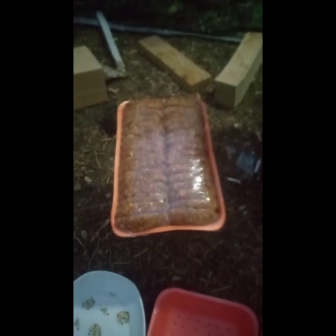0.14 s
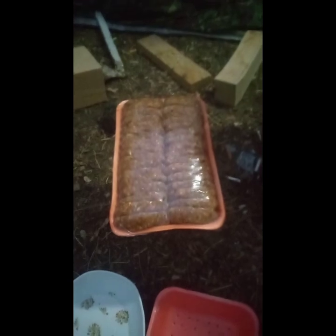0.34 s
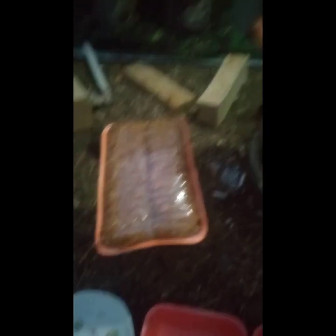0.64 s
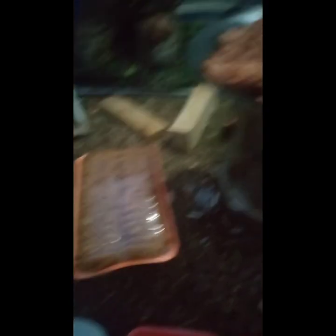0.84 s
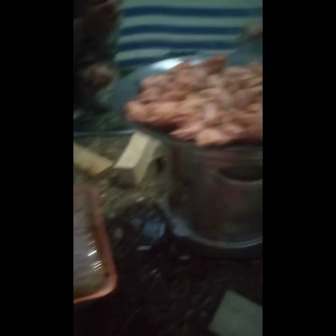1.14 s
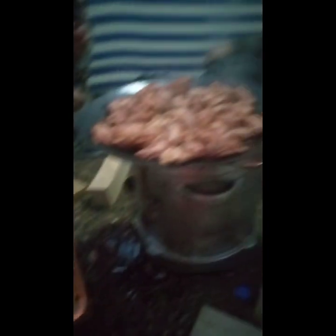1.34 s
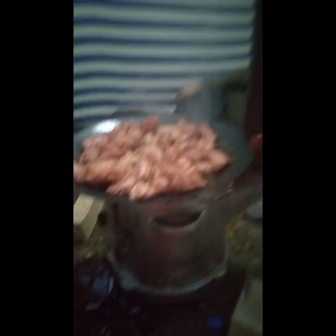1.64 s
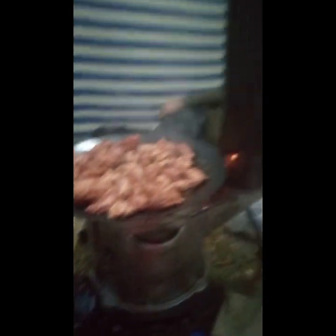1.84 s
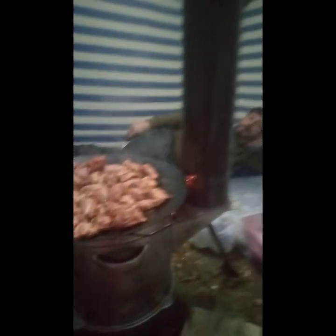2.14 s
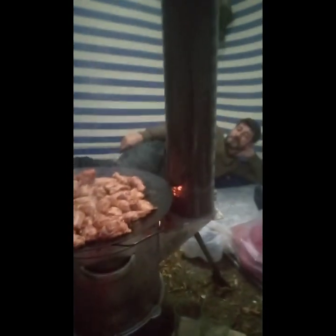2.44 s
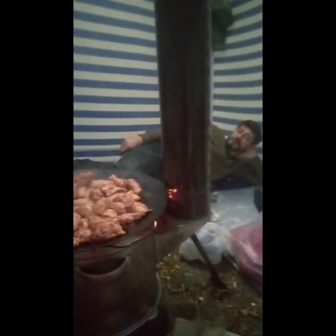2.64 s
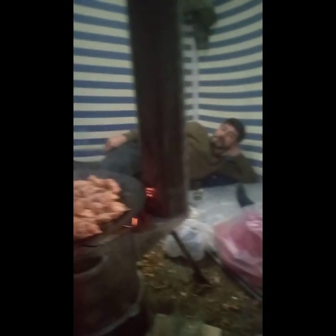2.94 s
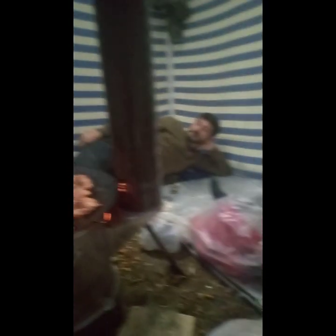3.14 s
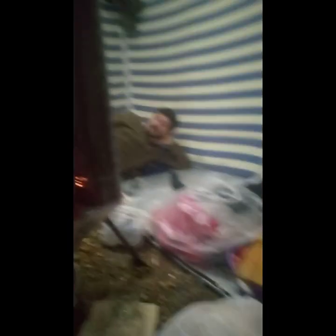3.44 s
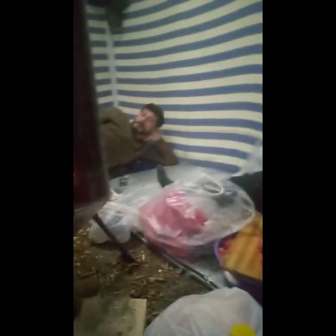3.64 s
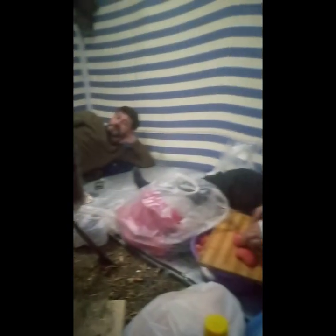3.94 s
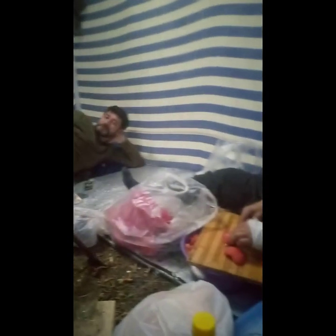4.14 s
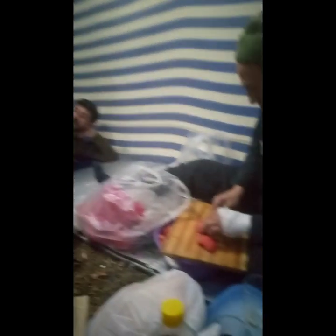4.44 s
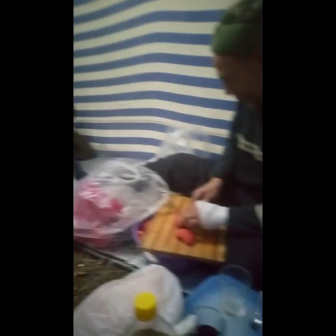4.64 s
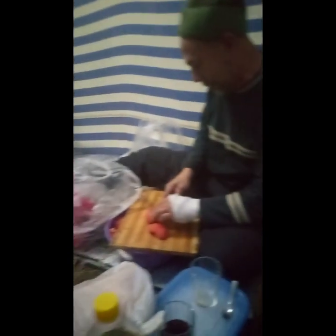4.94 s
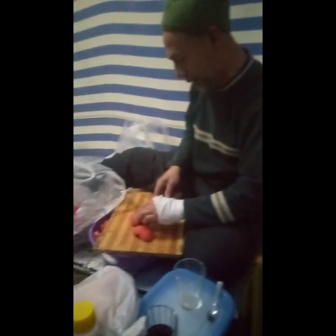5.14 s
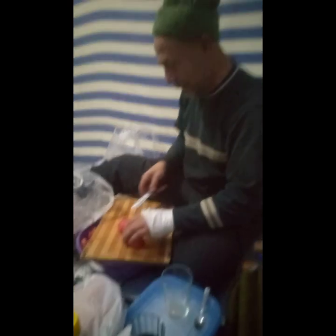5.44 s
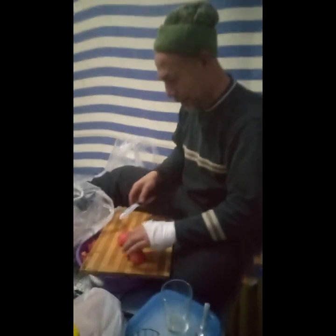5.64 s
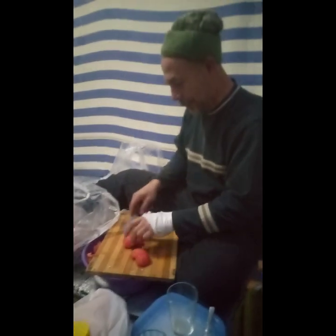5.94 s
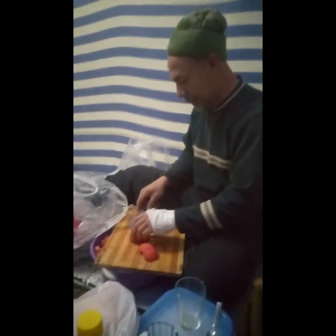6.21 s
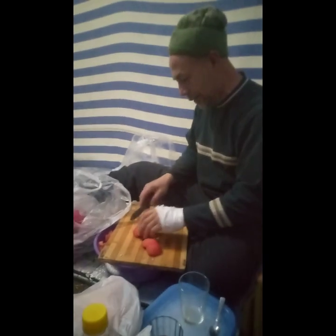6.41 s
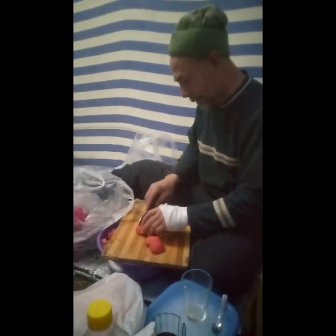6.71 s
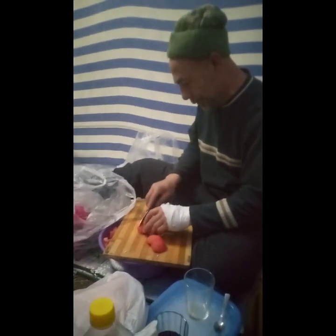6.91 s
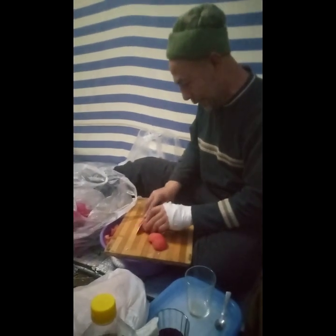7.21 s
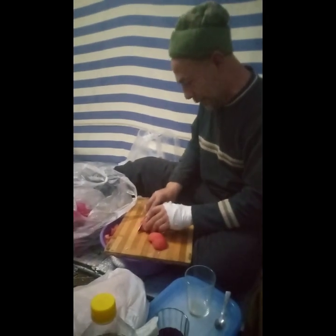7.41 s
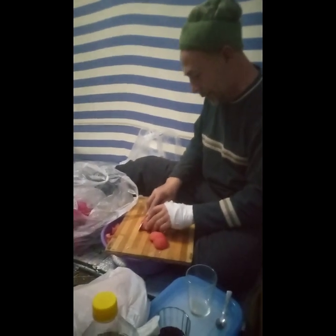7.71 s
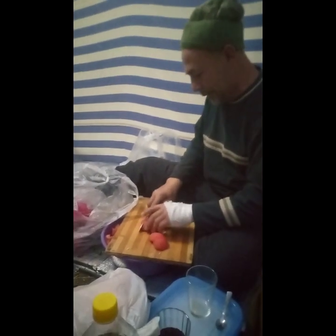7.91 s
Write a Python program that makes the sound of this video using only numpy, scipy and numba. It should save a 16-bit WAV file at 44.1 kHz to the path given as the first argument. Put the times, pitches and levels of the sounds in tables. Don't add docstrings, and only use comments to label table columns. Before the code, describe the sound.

Close microphone inside a tent at night: steady hissing rain made of thousands of tiny ringing droplets all around, with a short soft wash from the cloth. Single bright ticks and louder crisp drops burst at uneven moments, strongest just after two seconds, followed by small spitting bubbles. Soft cloth thuds come between them, the last strong one near the end. A quiet low stove draught wavers underneath throughout.

```python
import sys
import numpy as np
from scipy import signal
from scipy.fft import rfft, irfft, next_fast_len
from scipy.io import wavfile
from scipy.ndimage import uniform_filter1d
from numba import njit

SR = 44100
rng = np.random.default_rng(int(sys.argv[2]) if len(sys.argv) > 2 else 0)


def generate_wav(sig):
    pcm = np.round(np.clip(np.atleast_2d(sig).T, -1, 1) * 32767).astype(np.int16)
    wavfile.write(sys.argv[1], SR, pcm)


def undo_db(level):
    steps = np.asarray(level, float) / 20
    return 10 ** steps


N = 355887

NEAR_DB = -2.5


def curve(table):
    s, *columns = np.transpose(table)
    return [np.interp(np.arange(N) / SR, s, c) for c in columns]


def unit(x):
    return x / np.sqrt(np.mean(x ** 2))


def walk(rate):
    hold = int(SR / rate)
    steps = np.repeat(rng.standard_normal(N // hold + 1), hold)
    return 3.4 * uniform_filter1d(uniform_filter1d(steps, hold), hold)[:N]


def band(x, hz, width):
    return signal.lfilter(*signal.iirpeak(hz, hz / width, SR), x)


def colour_db(hz):
    # f/Hz, level/dB (per Hz)
    response = [(410, -35), (800, -17.5), (1700, -7), (2600, -1.5), (3460, -0.5), (5590, 0.5), (6550, 4),
                (7250, 0.5), (8260, -12.5), (9770, -20.5), (13700, -26), (14700, -9.5), (15400, -13),
                (17000, -25)]
    knot_hz, knot_db = np.transpose(response)
    return np.interp(np.log(np.maximum(hz, 1)), np.log(knot_hz), knot_db)


def coloured(x):
    cepstrum = irfft(np.log(undo_db(colour_db(np.fft.rfftfreq(2048, 1 / SR)))))
    cepstrum[1:1024] *= 2
    cepstrum[1025:] = 0
    return signal.fftconvolve(x, irfft(np.exp(rfft(cepstrum))))[:N]


@njit
def grains(start, hz, t60, octaves, size):
    out = np.zeros(N)
    for g in range(len(start)):
        length, phase = max(int(t60[g] * SR), 2), 0.
        step, a = 2 * np.pi * hz[g] / SR, size[g]
        rise, fade = 2 ** (octaves[g] / length), 1e-3 ** (1 / length)
        for i in range(max(start[g], 0), min(start[g] + length, N)):
            phase, step, a = phase + step, min(step * rise, 3.), a * fade
            out[i] += a * np.sin(phase)
    return out


def ring(s, hz, t60, octaves, size):
    return grains((s * SR).astype(np.int64), 1. * hz, t60 + 0 * s, octaves + 0 * s, 1. * size)


def tent(x, near_db=0):
    t60_s, rise_s, wash_db = 0.17, 0.0029, 1
    t = np.arange(8192) / SR
    tail = rng.standard_normal(len(t)) * undo_db(-60 * t / t60_s) * np.minimum(t / rise_s, 1)
    return x + undo_db(wash_db + near_db) * signal.fftconvolve(x, tail / np.linalg.norm(tail))[:N]


def stove():
    # t/s, level/dB
    draught = [(0.0, -49.5), (0.29, -48.5), (0.43, -53), (0.94, -47.5), (2.36, -49.5), (2.43, -56),
               (2.74, -47), (3.14, -52), (3.26, -47.5), (3.57, -54), (3.64, -48.5), (4.79, -47.5),
               (5.55, -57.5), (6.09, -50.5), (6.18, -45), (6.43, -48.5), (7.93, -46.5), (8.07, -48)]
    # f/Hz, width/Hz, level/dB
    flue_modes = [(72.4, 47, -7.5), (158.1, 30, -1.5), (228.9, 31.8, 0), (303.5, 26, -9), (103, 66, -6.5)]
    # t/s, level/dB
    air = [
        (0.0, -53.5),
        (3.06, -56.5),
        (3.42, -59.5),
        (4.85, -58.5),
        (5.06, -61.5),
        (7.24, -59),
        (8.07, -62.5),
    ]
    flue = 0
    for hz, width, db in flue_modes:
        mode = band(band(rng.standard_normal(N), hz, 1.4 * width), hz, 1.4 * width)
        flue = flue + undo_db(db + 0.59 * walk(6)) * unit(mode)
    murmur = band(rng.standard_normal(N), 657, 750) * undo_db(0.59 * walk(12))
    return unit(flue) * undo_db(curve(draught)[0]) + unit(murmur) * undo_db(curve(air)[0] + 1.0)


def squeak():
    # start t/s, end t/s, f/Hz, level/dB, octave level/dB
    whistle = (1.7, 1.82, 1405, -52, -56)
    start, end, hz, db, octave_db = whistle
    t = np.arange(N) / SR
    gate = np.clip(np.minimum(t - start, end - t) / 0.0081, 0, 1)
    return gate * (undo_db(db) * np.sin(2 * np.pi * hz * t) + undo_db(octave_db) * np.sin(4 * np.pi * hz * t))


def patch():
    when, pitch, size = rng.random((5000, 3)).T
    hz = 800 * undo_db(26 * pitch)
    single = ring(when * N / SR, hz, 2.8 / hz, 0.22, hz * undo_db(-3.5 * np.log(size + 0.057)))
    when, pitch, size = np.repeat(rng.random((140, 3)), 12, axis=0).T
    late, detune, loud = rng.standard_normal((len(when), 3)).T
    hz = 1900 * undo_db(18.5 * pitch) * undo_db(1.22 * detune)
    strength = hz * undo_db(3.5 * loud - 1.4 * np.log(size + 0.15))
    swarm = ring(when * N / SR + .009 * np.abs(late), hz, 12 / hz, 0.54, strength)
    return tent(unit(single) * undo_db(-5.5) + unit(swarm) * undo_db(-9.5))


def mist_db():
    # start t/s, length/s, level/dB
    puffs = [(0.397, 0.124, -47.5), (0.55, 0.03, -44), (0.74, 0.046, -46), (0.821, 0.13, -48.5),
             (0.9, 0.056, -47), (1.61, 0.076, -48), (1.994, 0.053, -45), (2.1, 0.19, -45),
             (2.505, 0.029, -49.5), (2.714, 0.035, -51), (3.622, 0.097, -49), (3.994, 0.11, -45.5),
             (4.51, 0.061, -49), (4.62, 0.046, -43.5), (4.776, 0.081, -50), (5.285, 0.38, -51.5),
             (5.862, 0.031, -47), (5.944, 0.08, -50.5), (6.176, 0.34, -48), (6.425, 0.068, -51.5),
             (6.518, 0.064, -45), (6.888, 0.062, -46), (6.978, 0.052, -52), (7.074, 0.067, -46.5),
             (7.186, 0.12, -50), (7.771, 0.038, -46)]
    quiet_db, rise_s = -52, .012
    start, length, db = np.transpose(puffs)[:, :, None]
    since = np.arange(0, N, 64) / SR - start
    shape = np.clip(np.minimum(since / rise_s, 1.6 - 1.2 * since / length), 0, 1)
    return np.repeat(np.max((db - quiet_db) * shape, axis=0), 64)[:N]


def patter():
    # t/s, level/dB, fineness/dB (finer droplets tilt the sound upward)
    rain = [(0.0, -42.5, 0), (0.4, -42.5, -3.5), (0.97, -43.5, 2.5), (1.32, -43, 5.5), (2.0, -43, -1),
            (2.22, -43, 0.5), (2.72, -43, 1.5), (4.54, -43.5, 3), (4.63, -43, 4.5), (5.1, -43, 2),
            (5.55, -40, 2.5), (5.73, -43, 2), (6.16, -40.5, 0.5), (6.29, -43, 2), (6.83, -43.5, 2.5),
            (7.26, -41.5, 0.5), (7.64, -44.5, 4), (8.07, -44, 4)]
    splits_hz, gust_hz, gusts_db = (4500, 8000), 14, (.4, .5, .7)
    flat = unit(sum(patch() for _ in range(5))) + undo_db(-3) * rng.standard_normal(N)
    size = next_fast_len(N)
    spectrum, f = rfft(coloured(flat), size), np.fft.rfftfreq(size, 1 / SR)
    below = [1 / (1 + (f / edge) ** 8) for edge in splits_hz]
    parts = below[0], below[1] - below[0], 1 - below[1]
    level_db, fine_db = curve(rain)
    level_db = level_db + 0.6 * walk(150)
    mist = mist_db()
    tilts = 0.5, -2.73 + fine_db + 0.68 * mist, -12 + 0.16 * fine_db + mist
    out = 0
    for part, tilt, gust_db in zip(parts, tilts, gusts_db):
        db = level_db + tilt + gust_db * walk(gust_hz)
        out = out + unit(irfft(spectrum * part)[:N]) * undo_db(db)
    return out


def thuds():
    # t/s, peak level/dB, f/Hz
    thumps = [(0.835, -41, 538), (1.394, -41, 930), (2.138, -40, 647), (2.449, -41, 654), (3.109, -41, 670),
              (3.276, -46, 770), (4.342, -53, 845), (4.847, -48, 767), (5.137, -50, 940), (6.244, -45, 875),
              (6.52, -56, 865), (7.123, -48, 890), (7.22, -36, 600), (4.812, -47, 625), (6.161, -55, 686),
              (6.18, -47, 920), (6.296, -43, 426), (7.164, -41, 430), (7.523, -33.5, 475)]
    s, peak_db, hz = np.repeat(np.transpose(thumps), 4, axis=1)
    late, detune = rng.random((len(s), 2)).T
    thump = ring(s + 0.00617 * late, hz * undo_db(13.0 * (detune - 1.11)), 0.014, 0.15, undo_db(peak_db + 2.5))
    return tent(signal.sosfilt(signal.butter(2, 220, "high", fs=SR, output="sos"), thump), NEAR_DB)


def specks():
    # t/s, peak level/dB
    spray_specks = [(0.447, -34), (0.4938, -31), (2.088, -27), (2.1385, -28), (3.6217, -38), (4.006, -29),
                    (4.7875, -35), (5.3896, -41), (5.425, -36), (5.973, -37), (6.002, -31.5), (6.2851, -33),
                    (6.779, -41), (6.9735, -44)]
    s, peak_db = np.repeat(np.transpose(spray_specks), 5, axis=1)
    late, pitch, loud = rng.random((len(s), 3)).T
    hz = 11500 * undo_db(2.7 * pitch)
    rings = ring(s + 0.0083 * late ** 6.0, hz, 6 / hz, .05, undo_db(peak_db + 17.5 + 6 * loud))
    return tent(coloured(rings), NEAR_DB)


def ticks():
    # t/s, peak level/dB, f/Hz
    early = [(0.0308, -25.0, 2780), (0.2598, -26.0, 3530.0), (0.3999, -26, 3140.0), (0.4748, -19.0, 6720.0),
             (0.4873, -23.0, 6500.0), (0.4924, -17, 6460.0), (0.5123, -19, 2640), (0.5559, -29, 5250.0),
             (0.7493, -30, 2370.0), (0.8438, -24.0, 3500), (1.1837, -27, 3570.0), (1.2115, -20, 3920.0),
             (1.2292, -23.0, 6850.0), (1.2345, -20, 6590.0), (1.3955, -20, 3570.0), (1.4095, -25, 3100.0),
             (1.4112, -25, 2670.0), (1.5366, -18, 5860.0), (1.5388, -24.0, 6370.0), (1.5471, -17, 4650.0),
             (1.6378, -23.0, 6720.0), (1.6499, -17, 4870.0), (1.7191, -22.0, 6500.0), (1.9288, -27, 2240.0),
             (2.0993, -18, 4570.0), (2.1422, -15.0, 6980.0), (2.277, -27, 2970.0), (2.2936, -19.0, 5300.0),
             (2.4534, -25.0, 3490.0), (2.6313, -28, 3660.0), (2.6401, -18, 3240), (2.7335, -22, 3450.0),
             (2.7409, -23, 5990.0), (2.9197, -20, 6930.0), (2.949, -18, 3750.0), (2.9535, -24.0, 3060.0),
             (3.0241, -25, 3620.0), (3.0384, -24.0, 3490.0), (3.111, -14, 6160.0), (3.173, -25, 5640.0),
             (3.2361, -23, 3190.0), (3.2779, -25.0, 3920.0), (3.2924, -21, 3700.0), (3.3076, -22, 6370.0),
             (3.3492, -20, 6290.0), (3.3686, -17, 5860.0), (3.4148, -27, 6680.0), (3.429, -12, 6760.0),
             (3.4304, -29, 6200.0), (3.4916, -18, 3500), (3.8642, -27.0, 3140.0), (3.9478, -14, 4780.0),
             (4.0152, -16.0, 6760.0), (4.0434, -20.0, 6500.0), (4.0457, -19.0, 6330.0),
             (4.1218, -21.0, 2890.0), (4.1436, -19, 4480.0), (4.3486, -16, 6590.0), (4.3504, -29, 3700.0),
             (4.5111, -23, 4130.0)]
    # t/s, peak level/dB, f/Hz
    later = [(4.5145, -20.0, 4310.0), (4.5737, -24, 6330.0), (4.6455, -18, 4910.0), (4.6476, -21, 4390.0),
             (4.7232, -15, 4630), (4.7606, -22.0, 5120.0), (4.8255, -22.0, 3320.0), (4.8286, -21.0, 2230),
             (5.1929, -25, 2450.0), (5.2624, -20, 5120.0), (5.5387, -23, 4390.0), (5.5423, -25, 2760.0),
             (5.5551, -25, 3700.0), (5.6541, -25, 5680.0), (5.7103, -15, 6500.0), (5.7762, -15, 5560.0),
             (5.8747, -19, 4950.0), (5.8796, -24, 5600.0), (6.056, -22, 4740.0), (6.1743, -19, 5900.0),
             (6.2971, -21.0, 4220.0), (6.3, -17, 4050.0), (6.3351, -20, 6630.0), (6.3398, -22, 2670.0),
             (6.4097, -25.0, 6420.0), (6.446, -26, 4520.0), (6.471, -22, 6760.0), (6.475, -19, 6120.0),
             (6.5319, -22.0, 4260.0), (6.5355, -12, 4130.0), (6.7607, -30, 3880.0), (6.8377, -28, 6630.0),
             (6.906, -20, 6420.0), (6.9082, -23.0, 7020.0), (6.9333, -22.0, 5510.0),
             (6.9379, -21.0, 4050.0), (6.9451, -25, 4010.0), (6.9785, -23.0, 4740.0),
             (7.0121, -21.0, 5900.0), (7.079, -26, 2890.0), (7.1944, -23, 4520.0), (7.2037, -22, 4650.0),
             (7.2085, -28, 2630.0), (7.2539, -16, 5640.0), (7.2554, -21, 3620.0), (7.3229, -20, 2710.0),
             (7.3967, -24.0, 2800.0), (7.4917, -23.0, 5430.0), (7.5966, -27, 5860.0), (7.5992, -25, 4740.0),
             (7.6249, -19.0, 4740.0), (7.6513, -28, 3790.0), (7.721, -28, 4480.0), (7.7851, -27, 5900.0),
             (7.8106, -29, 5940.0), (7.8152, -21.0, 5680.0), (7.9678, -31, 3360.0), (7.9835, -29, 6680.0),
             (7.9861, -23, 5730.0), (8.0284, -22, 4870.0)]
    s, peak_db, hz = np.transpose(list(early) + list(later))
    rings = ring(s, hz, 8 / hz, 0.083, undo_db(peak_db + 1.5 - colour_db(hz)))
    return tent(coloured(rings), -8)


def all_drops():
    # t/s, ring peak level/dB, f/Hz, splash level/dB (re ring)
    heavy = [(0.473, -14, 6980, -23), (1.195, -17, 6650, -23), (1.396, -23, 3300, -20),
             (1.637, -18, 6900, -20), (1.998, -19, 6900, -24), (2.0888, -14, 3360, -31),
             (2.1401, -5.5, 7160, -32), (2.15, -8.5, 5760, -23.5), (2.2807, -15, 6610, -28),
             (3.023, -21, 3660, -42), (3.315, -11, 6130, -28), (3.4155, -15, 6300, -23),
             (3.691, -13.5, 5800, -27), (4.0055, -14, 6510, -29), (4.02, -16, 7700, -16),
             (4.5098, -9.5, 5050, -33), (4.6433, -20, 4030, -21), (4.7578, -15.5, 5070, -26),
             (4.817, -13, 3800, -31), (5.4685, -18.5, 5500, -23), (5.5363, -25, 6300, -29),
             (5.875, -16.5, 4600, -21), (6.168, -15.5, 5890, -27), (6.217, -19, 3560, -25),
             (6.257, -13.5, 3930, -24), (6.295, -14, 4070, -21.5), (6.534, -9, 4900, -24),
             (7.1222, -22, 5330, -24), (7.206, -17, 4800, -19), (7.5944, -19, 4650, -21)]
    # t/s, ring peak level/dB, f/Hz
    light = [(1.22, -8, 6840), (1.537, -16, 5940), (1.5454, -20, 5500), (1.6253, -14, 6790),
             (1.718, -9, 6610), (2.379, -21, 3400), (3.3477, -14, 6000), (3.425, -13.5, 5140),
             (3.541, -18, 3440), (3.957, -17, 4700), (3.9615, -14.5, 4900), (3.073, -24, 6500),
             (3.084, -14, 5500), (6.474, -17, 6500), (4.0152, -19, 6500), (4.492, -16, 6190),
             (4.8556, -11.5, 4330), (4.984, -15, 3420), (5.261, -22, 2870), (5.9255, -32, 4210),
             (6.334, -17, 6500), (6.7595, -29, 3860), (6.976, -16, 4790), (7.2529, -19, 3340),
             (7.2832, -21, 3540), (7.4946, -14, 6400), (7.623, -13, 4600), (7.81, -16, 5740),
             (7.9662, -13.5, 3800)]
    light_splash_db = np.full((1, len(light)), -35.)
    return np.hstack([np.transpose(heavy), np.vstack([np.transpose(light), light_splash_db])])


def trains():
    # t/s, level/dB, f/Hz, length/s
    air_pockets = [(0.054, -52, 1620, .028), (0.857, -41.5, 1790, .013), (1.11, -50, 1600, 0.0099),
                   (1.12, -47, 1820, 0.023), (1.135, -48, 2300, .015), (1.22, -46, 2110, .02),
                   (1.406, -41, 2740, .009), (1.878, -50, 1220, .02), (1.92, -44.5, 2300, .03),
                   (2.33, -47, 1990, .035), (2.362, -45, 2300, 0.013), (2.865, -47, 2250, .02),
                   (2.378, -49, 1950, .013), (2.45, -45, 1430, .04), (2.82, -50, 1160, .018),
                   (3.156, -45, 1620, 0.018), (3.365, -46, 1980, .006), (4.048, -45.5, 2150, .035),
                   (7.69, -53, 1410, 0.016), (4.26, -44, 1870, .03), (4.342, -42.5, 1310, 0.021),
                   (4.479, -45, 1970, .016), (4.641, -43, 2240, .005), (4.818, -40, 2240, .02),
                   (4.845, -46, 2040, 0.018), (5.436, -46, 2050, .024), (5.626, -40, 1940, .006),
                   (5.958, -42.5, 1600, .015), (6.1, -47.5, 1840, .035), (6.536, -39.5, 1485, .01),
                   (6.552, -46, 1470, 0.026), (6.686, -43, 2100, .008), (6.929, -46, 2140, .019),
                   (7.065, -49, 2040, .039), (7.539, -51, 1370, .015), (7.777, -46, 2030, .036),
                   (0.568, -42.5, 6860, 0.027), (0.905, -46.5, 2700, 0.033), (1.159, -47, 3830, 0.03),
                 (1.236, -44, 3100, 0.038), (1.303, -46, 2430, 0.023), (3.019, -43, 3600, .018),
                 (2.22, -42, 5350, 0.026), (2.234, -43, 3200, 0.048), (2.537, -44, 2770, 0.0057),
                 (3.293, -42, 4500, 0.017), (3.579, -44, 2680, .009), (3.651, -39, 3200, 0.014),
                 (4.041, -43, 3830, 0.012), (4.119, -42, 2620, 0.04), (4.274, -44, 2560, 0.022),
                 (4.414, -41, 3720, 0.014), (4.866, -43, 3400, 0.011), (5.537, -46, 2380, 0.027),
                 (5.538, -41, 4130, 0.033), (5.644, -47, 2460, 0.021), (5.909, -40, 3800, 0.028),
                 (6.053, -37.5, 4050, .012), (6.331, -36, 4810, 0.0092), (6.595, -42.5, 2260, 0.03),
                 (6.855, -44, 3060, 0.041), (6.912, -40.5, 3070, .019), (7.318, -40, 2600, 0.0073),
                 (7.4, -46, 2720, 0.0088), (7.437, -45, 2500, 0.017), (7.534, -41, 2970, .006)]
    # t/s, level/dB, f/Hz, length/s
    spits = [(0.588, -40, 1260.0, 0.0097), (0.667, -42, 1150.0, 0.0071), (1.257, -39, 2950, 0.01),
             (1.404, -37.5, 1460, 0.011), (1.543, -39, 4770.0, 0.0093), (1.766, -42.0, 1520, 0.011),
             (2.095, -38, 4820.0, 0.01), (2.147, -31.0, 4850, 0.0086), (2.15, -31, 2490, 0.0076),
             (2.175, -30, 4900, 0.01), (2.248, -35.0, 3270.0, 0.0091), (2.288, -36.0, 5280.0, 0.01),
             (2.464, -35, 2630, 0.011), (3.421, -33.0, 4590.0, 0.012), (3.579, -39, 2700.0, 0.01),
             (4.036, -33, 3620.0, 0.01), (4.04, -46, 1960, 0.01), (4.161, -39, 1780.0, 0.011),
             (4.356, -40, 1240, 0.01), (4.506, -38, 3900.0, 0.01), (4.641, -34, 5400.0, 0.0083),
             (4.642, -28.5, 4190.0, 0.01), (4.753, -39, 5230.0, 0.01), (4.81, -34.0, 4310.0, 0.01),
             (5.392, -34.0, 4130.0, 0.01), (5.533, -35.0, 4130.0, 0.0098), (5.593, -38, 3900.0, 0.01),
             (5.614, -38, 4590.0, 0.01), (5.682, -32.5, 3560.0, 0.01), (5.873, -35, 3000, 0.0088),
             (5.895, -32, 3400, 0.012), (5.906, -32, 4130.0, 0.01), (5.928, -32, 5050.0, 0.01),
             (5.95, -28.5, 4000, 0.0092), (5.951, -32, 4740, 0.0088), (6.088, -33, 4930, 0.012),
             (6.335, -36.0, 2660, 0.0092), (6.438, -34.5, 3960.0, 0.01), (6.529, -32, 3520, 0.011),
             (6.98, -40, 2030, 0.011), (7.119, -31, 5000, 0.01), (7.211, -46, 1550.0, 0.012),
             (7.28, -32, 3620.0, 0.01), (7.447, -34.5, 2530.0, 0.0091), (8.065, -37, 1320.0, 0.0081)]
    foam_db, foam_s, lead_s = -3, .008, 0.0022
    s, peak_db, hz, splash_db = all_drops()
    foam = np.transpose([s - lead_s, peak_db + splash_db + foam_db, hz, foam_s + 0 * s])
    return np.concatenate([air_pockets, foam, np.add(spits, (0, -9, 0, 0))])


def bubbles():
    s, db, hz, length = trains().T[:, :, None]
    place, detune, loud = np.moveaxis(rng.random((len(s), 14, 3)), 2, 0)
    place = place ** 1.25
    place[:, 0] = 0
    small = hz / 1400
    spread = np.minimum(0.076 * small ** 3.3, 0.3)
    pitch = hz * 2 ** (0.04 * (place - .15) + spread * (detune - .5))
    t60 = 0.031 / small ** 1.08 + 0 * place
    size = undo_db(db - colour_db(hz) + 1.5 + 6.2 * loud - 5.9 * place) * np.sqrt((length + 0.01) / t60)
    when = s + 1.3 * length * place
    rings = ring(when.ravel(), pitch.ravel(), t60.ravel(), 0.055, size.ravel())
    return tent(coloured(rings), -2.5)


def drops():
    s, peak_db, hz, tick_db = all_drops()
    late, detune, loud = np.moveaxis(rng.random((len(s), 16, 3)), 2, 0)
    late = -.008 * np.log(late + 1e-9)
    tick = np.zeros(N)
    tick[(s * SR).astype(int)] = undo_db(peak_db + tick_db + 25)
    fine = 9000 * undo_db(5 * detune)
    size = undo_db((peak_db + tick_db)[:, None] + 15 + 6.1 * loud - 330 * late)
    crackle = ring((s[:, None] + 1.9 * late).ravel(), fine.ravel(), 4 / fine.ravel(), .1, size.ravel())
    crack = ring(s, hz, 14 / hz, 0.086, undo_db(peak_db - 6.5 - colour_db(hz)))
    hz = np.minimum(hz[:, None] * undo_db(17.4 * (detune - 2.0)), 16000)
    size = undo_db(peak_db[:, None] - 18.0 + 9.7 * loud - 360 * late)
    spray = ring((s[:, None] + late).ravel(), hz.ravel(), 7 / hz.ravel(), .25, size.ravel())
    return tent(coloured(tick + crackle + crack + spray), NEAR_DB)


def scene():
    far = stove() + squeak()
    cloth = patter() + thuds()
    near = specks() + ticks() + bubbles() + drops()
    return (far + cloth + near)[None]


def top_cut(x):
    return signal.sosfilt(signal.butter(12, 16860, fs=SR, output="sos"), x)


def record(dry):
    x = signal.sosfilt(signal.butter(2, 50, "high", fs=SR, output="sos"), dry)
    x = signal.sosfilt(signal.ellip(14, .2, 80, 15560, fs=SR, output="sos"), x)
    return top_cut(x)


dry = scene()
out = record(dry)
generate_wav(out)
```